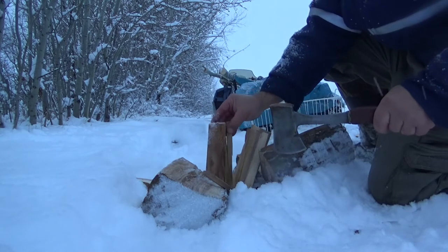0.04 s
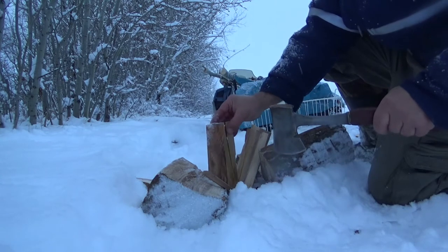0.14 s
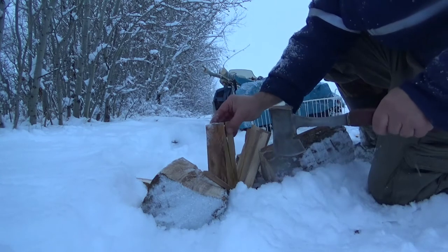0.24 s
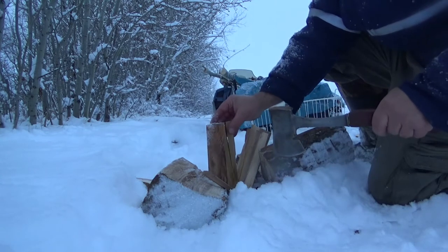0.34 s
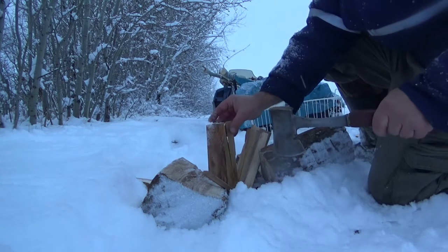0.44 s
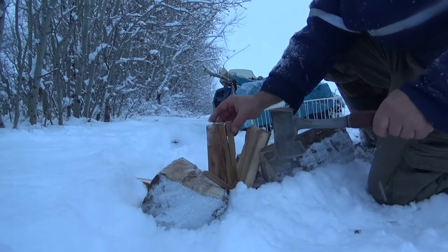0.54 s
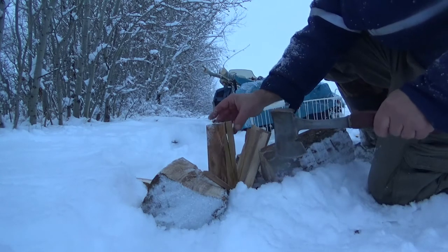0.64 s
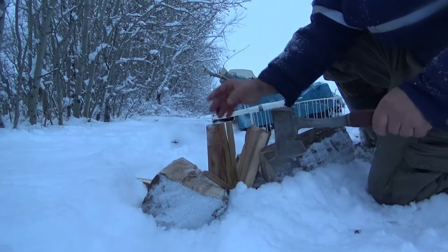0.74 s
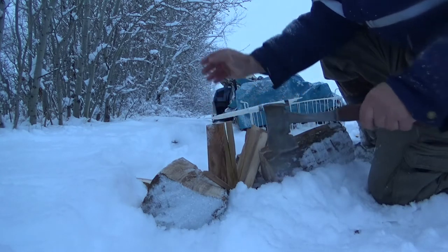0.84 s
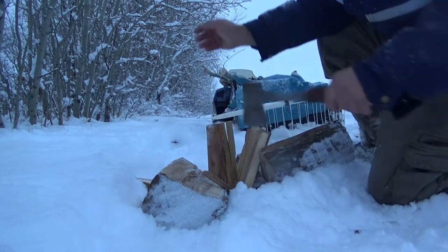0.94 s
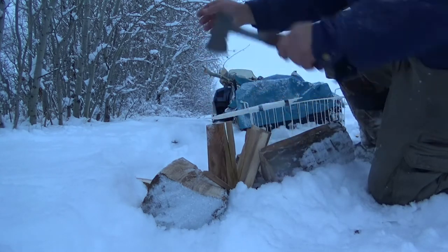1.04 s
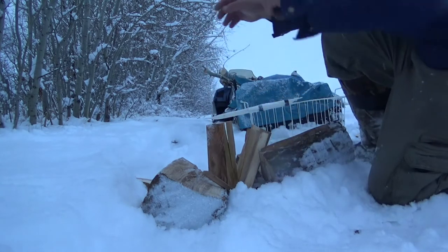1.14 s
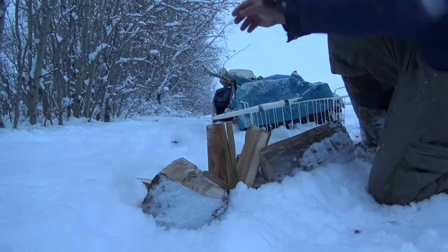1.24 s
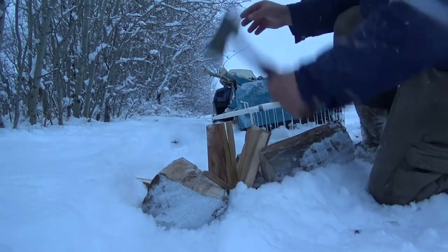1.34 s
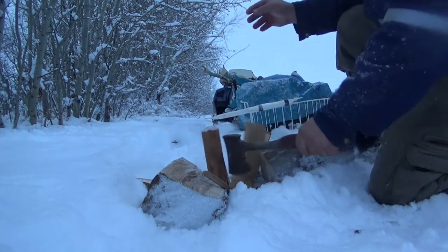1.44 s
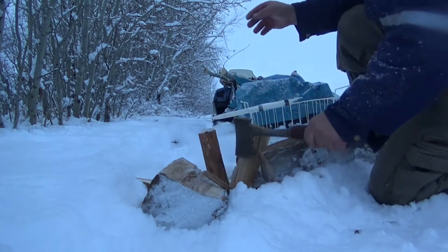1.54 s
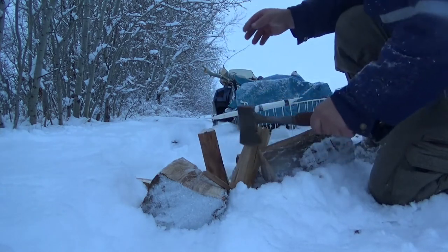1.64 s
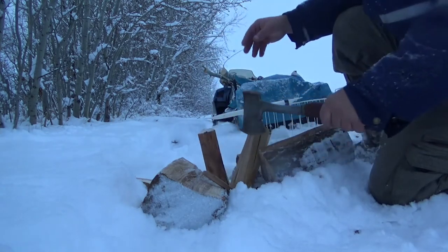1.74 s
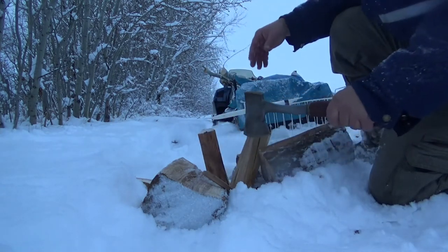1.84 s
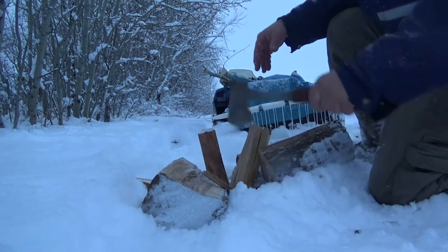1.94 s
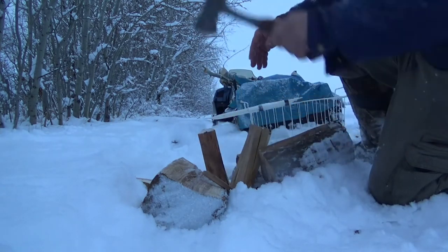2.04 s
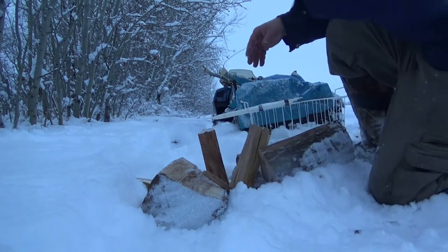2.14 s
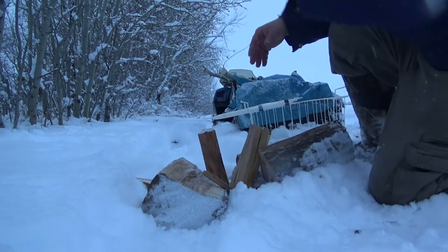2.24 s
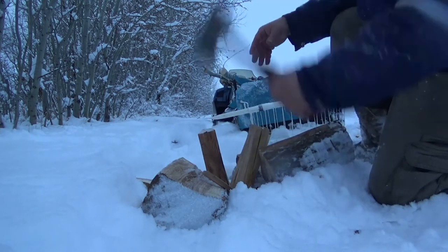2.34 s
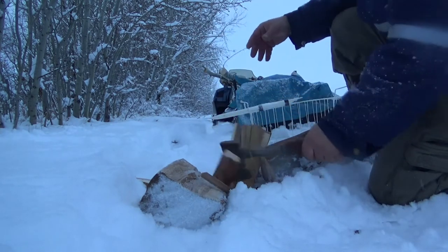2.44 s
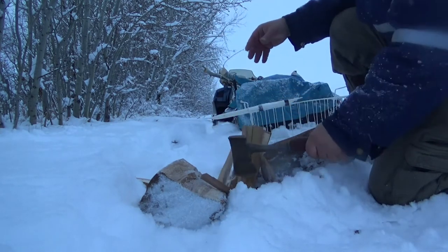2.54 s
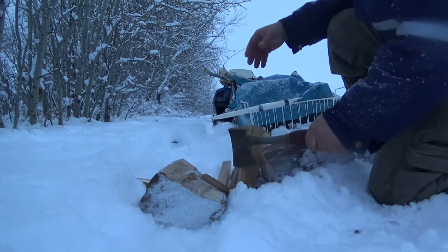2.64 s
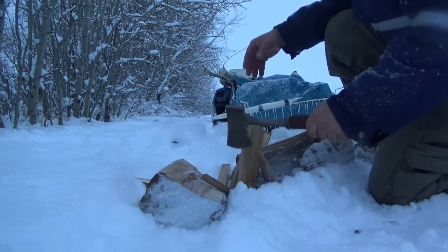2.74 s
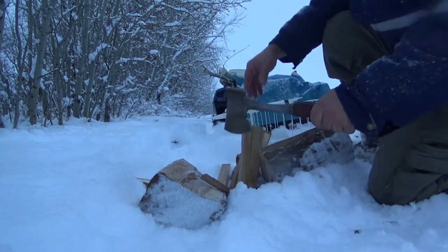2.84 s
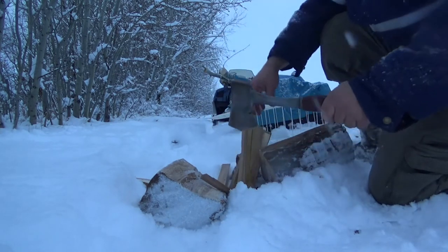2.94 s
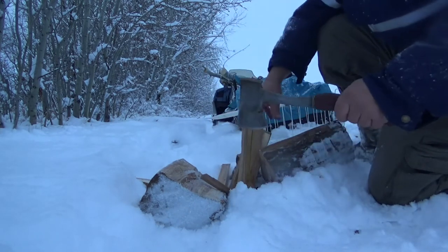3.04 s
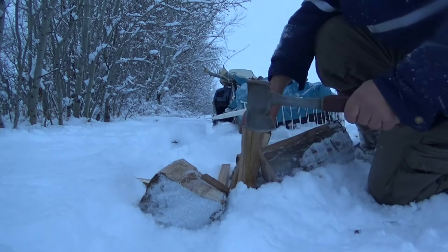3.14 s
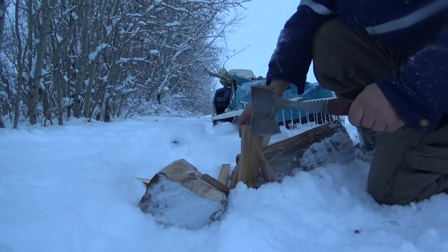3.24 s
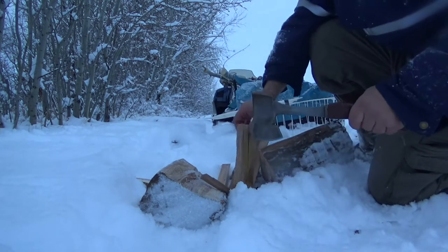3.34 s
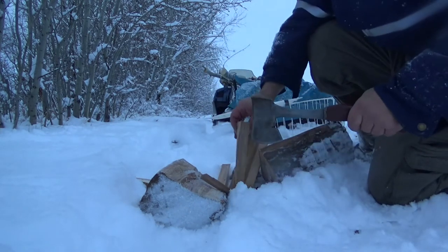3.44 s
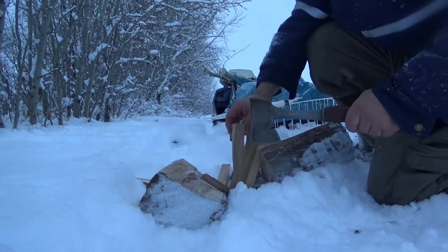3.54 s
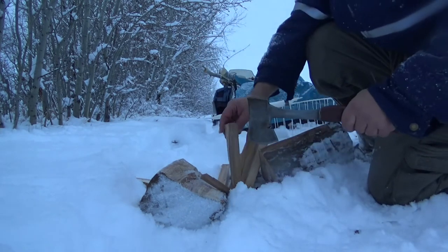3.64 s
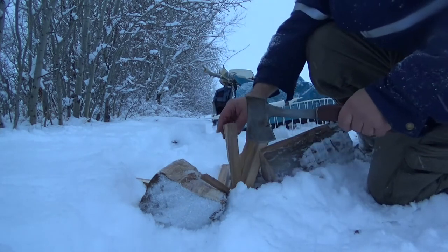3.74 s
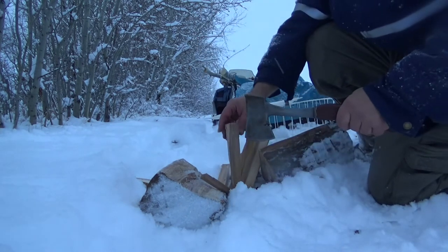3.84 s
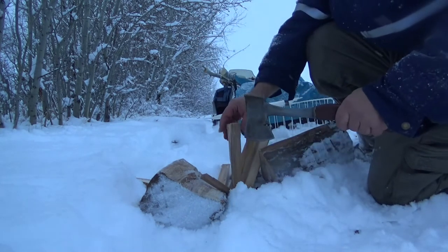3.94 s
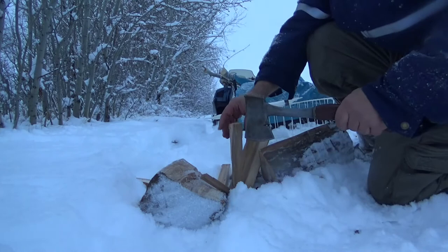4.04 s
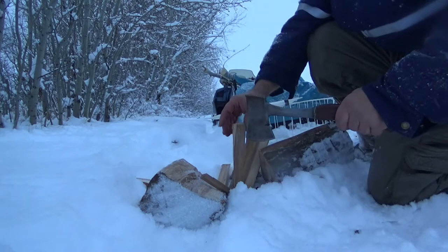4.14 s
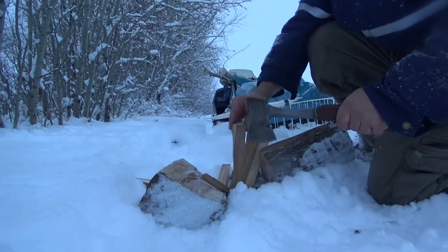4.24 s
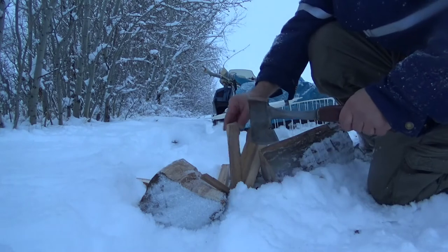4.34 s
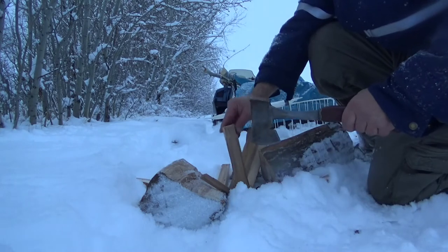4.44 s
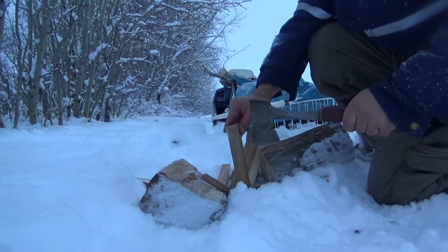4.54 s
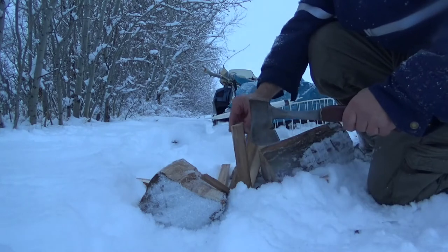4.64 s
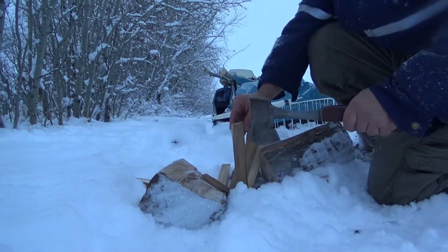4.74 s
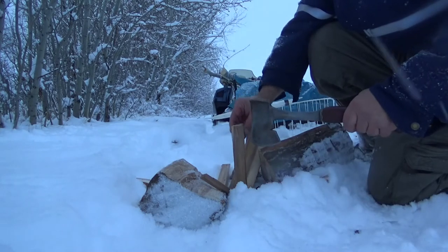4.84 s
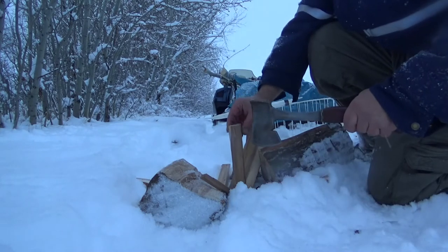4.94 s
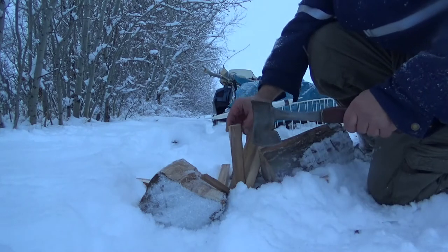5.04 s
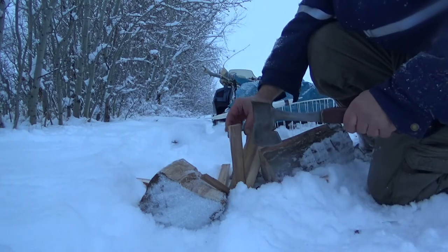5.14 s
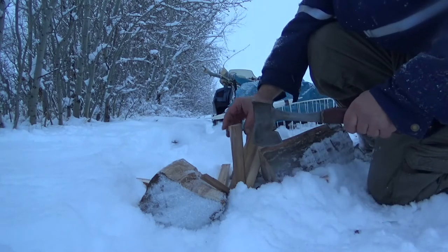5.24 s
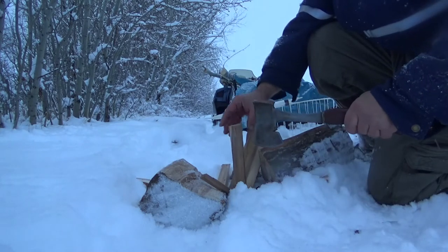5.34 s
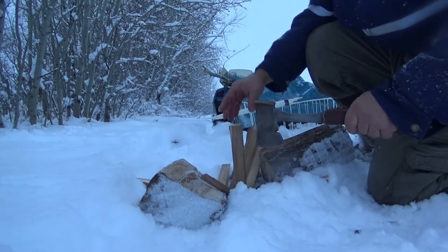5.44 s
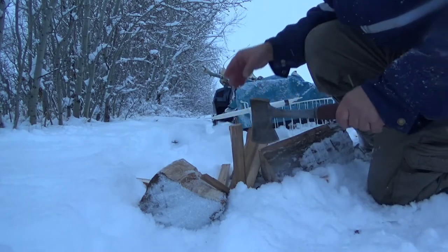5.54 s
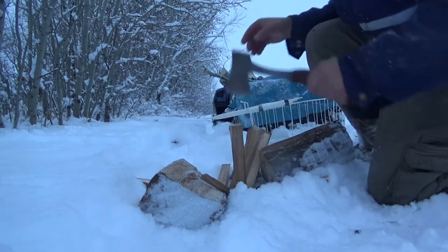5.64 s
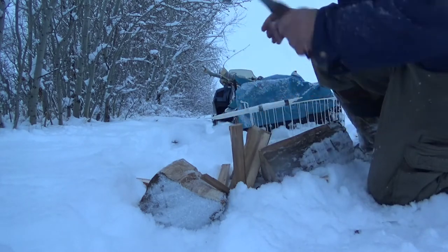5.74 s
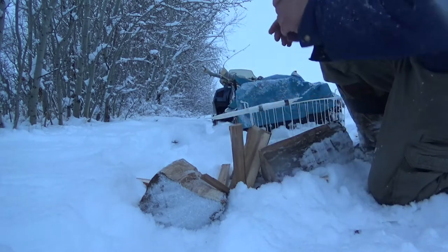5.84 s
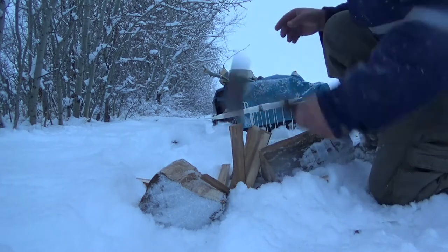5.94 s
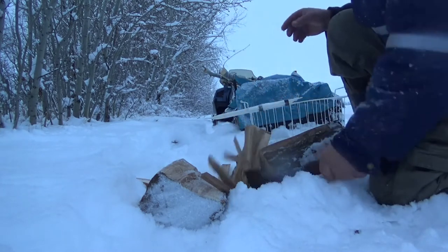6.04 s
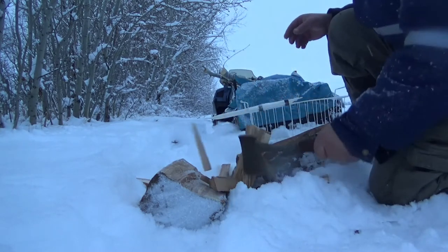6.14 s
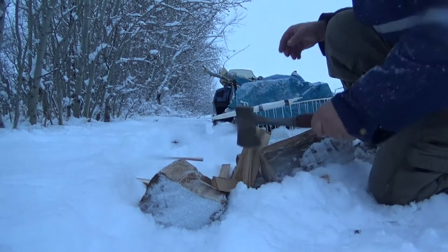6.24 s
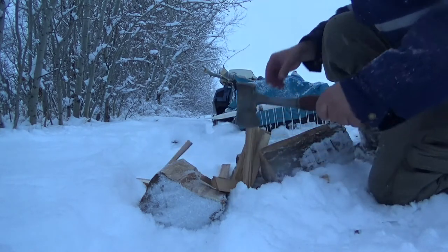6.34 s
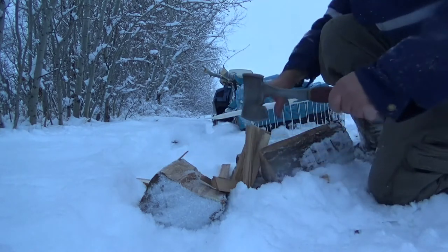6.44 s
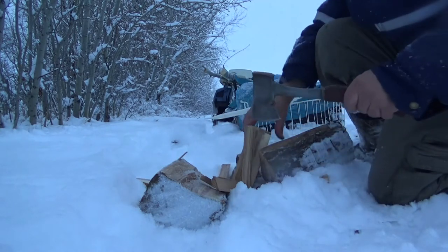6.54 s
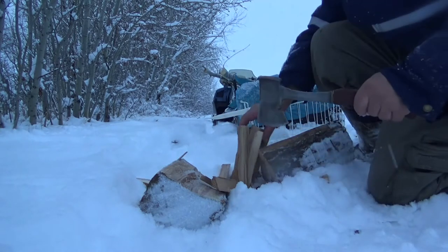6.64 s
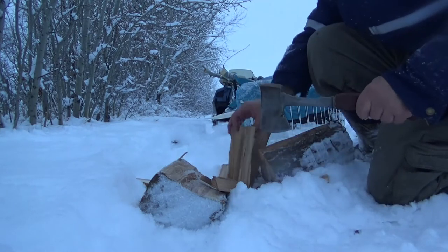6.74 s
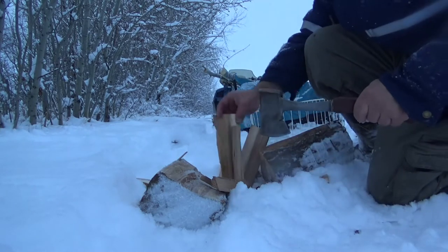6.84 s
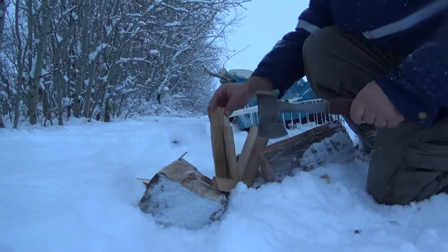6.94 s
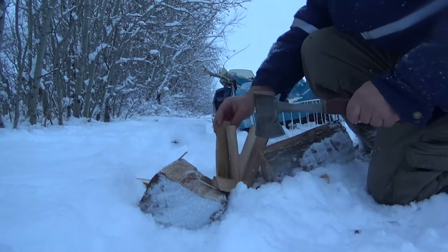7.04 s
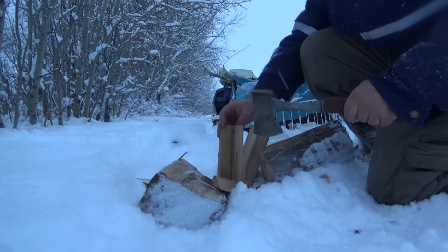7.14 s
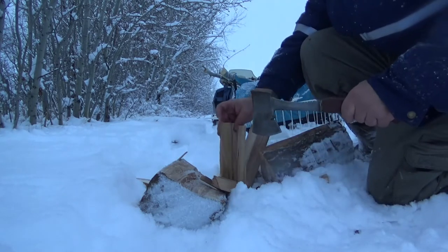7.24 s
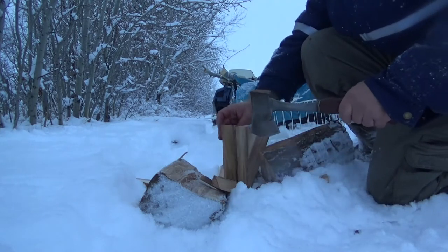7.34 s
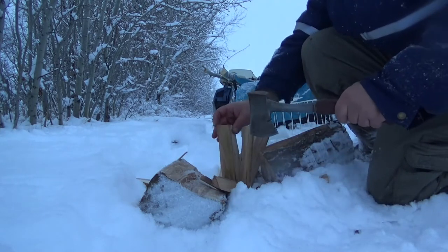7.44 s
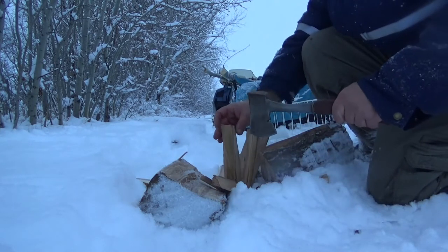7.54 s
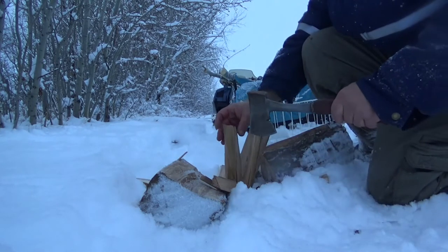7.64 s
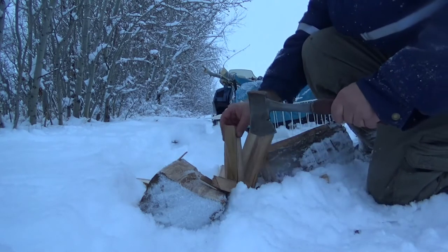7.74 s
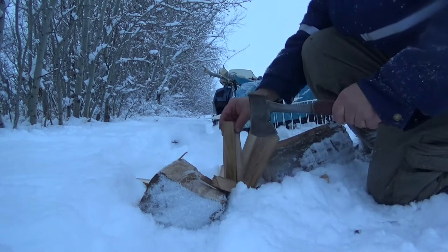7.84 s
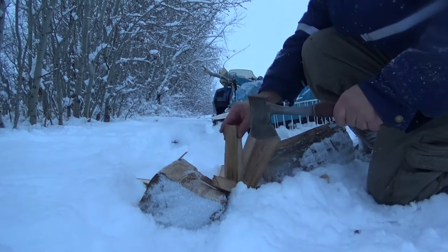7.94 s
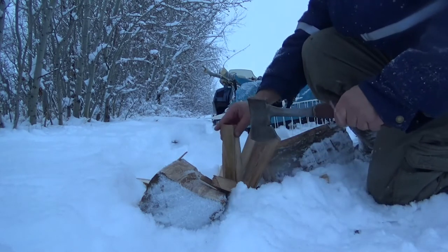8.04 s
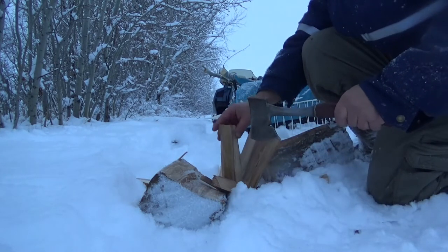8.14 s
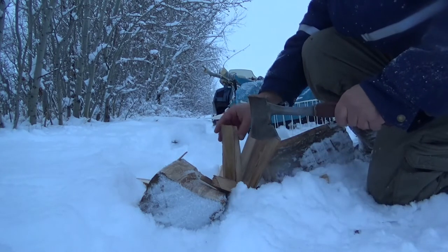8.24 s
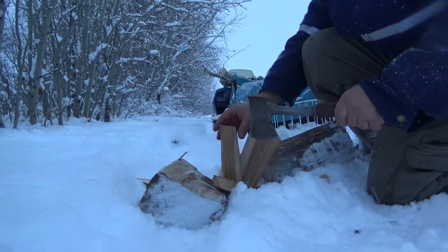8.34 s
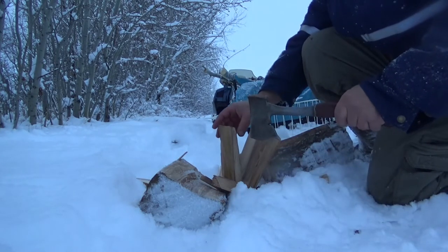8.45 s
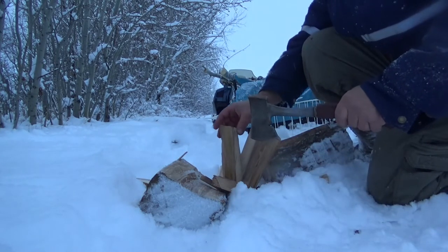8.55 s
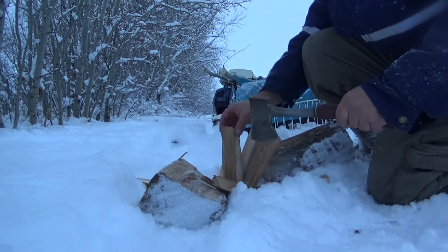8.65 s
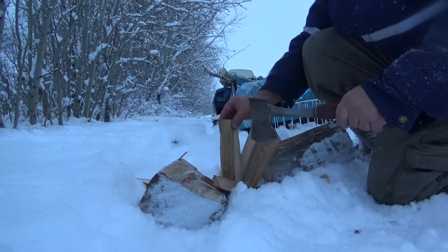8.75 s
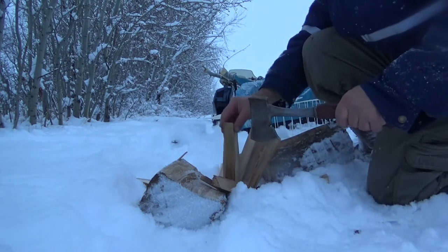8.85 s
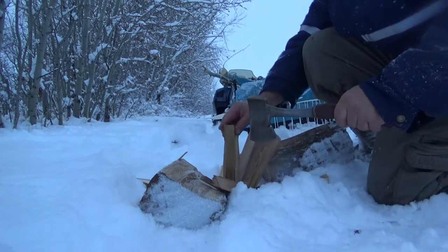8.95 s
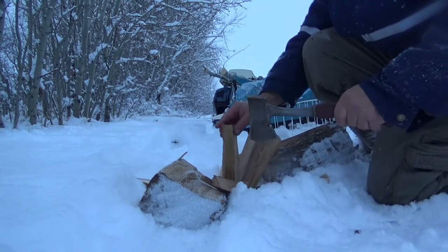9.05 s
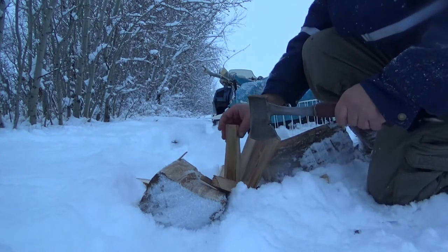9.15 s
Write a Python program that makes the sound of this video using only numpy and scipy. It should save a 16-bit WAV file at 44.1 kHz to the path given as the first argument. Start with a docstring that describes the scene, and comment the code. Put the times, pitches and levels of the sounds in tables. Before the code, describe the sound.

A dry, close outdoor scene: faint hum fading, jacket rustling, then a crisp hatchet blow and a second with longer tearing wood. A quiet pause of handling follows before a loud third crack with snapping, ticking chips. Sticks are then set up with small knocks and scrapes. Snow deadens the space; a hedge gives a barely audible tail, beneath soft air hiss and a tiny regular camera chirp. Everything sits nearly central.

```python
"""A faint hum dies away as someone kneeling in snow gets ready; then a hatchet splits kindling in three chops.
Two chops come close together and a third after a pause: a jacket swish, a bite of the blade, tearing fibres.
Between and after them splinters snap and clink, and pieces scrape and knock, built from shaped noise and modes.
Snow swallows nearly all echo; a hedge returns a faint tail, over still air and the camera's tiny, even chirp."""
import sys
import numpy as np
from scipy import signal
from scipy.fft import rfft, irfft
from scipy.io import wavfile

SR = 44100
rng = np.random.default_rng(int(sys.argv[2]) if len(sys.argv) > 2 else 0)


def inscribe(sig):
    """Save sig as 16-bit PCM at rate SR to the path in sys.argv[1].

    A 1-D sig is mono; a 2-D sig holds one channel per row.
    Samples are clipped to [-1, 1] before scaling.
    """
    pcm = np.round(np.clip(np.atleast_2d(sig).T, -1, 1) * 32767)
    wavfile.write(sys.argv[1], SR, pcm.astype(np.int16))


N = 405279
TIME = np.arange(N) / SR  # s
SHORT = TIME[:SR // 4]  # the time axis of one short event, s
FREQ = np.maximum(np.fft.rfftfreq(2048, 1 / SR), 1)  # axis of all spectra, Hz

# hatchet blows: t/s, bite level/dB, tearing hold/s, tearing t60/s, crackle level/dB, wood body level/dB
BLOWS = [(1.3509, -14.5, 0.01, 0.13, -17, -24), (2.35, -17, 0.027, 0.29, -33.5, -29),
         (5.9409, -12, 0.015, 0.13, -18, -25)]


def undb(db):
    """Decibels to gain."""
    return 10 ** (np.asarray(db) / 20)


def unit(x):
    """Scale to rms 1."""
    return x / np.sqrt(np.mean(x ** 2) + 1e-20)


def add(out, s, x):
    """Mix a sound in at time s."""
    i = max(int(s * SR), 0)
    out[i:i + len(x)] += x[:N - i]


def shape(points):
    """A spectrum in dB, joined on a log-frequency axis."""
    hz, db = np.transpose(points)
    return np.interp(np.log(FREQ), np.log(hz), db)


def hump(hz, octaves):
    """A bell of height 1 around a pitch."""
    return np.exp(-.5 * (np.log2(FREQ / hz) / octaves) ** 2)


def resonance(hz, q):
    """Power gain of one damped resonance."""
    return 1 / (1 + (q * (FREQ / hz - hz / FREQ)) ** 2)


def colour(x, db):
    """Causal minimum-phase filter with the given spectrum and unit power gain."""
    cepstrum = irfft(np.log(undb(db)))
    half = len(cepstrum) // 2
    # folding the cepstrum forward puts the response's energy first
    cepstrum[1:half] *= 2
    cepstrum[half + 1:] = 0
    response = irfft(np.exp(rfft(cepstrum)))[:half]
    return signal.fftconvolve(x, response / np.linalg.norm(response))[:len(x)]


def fade(t, t60):
    """Full level up to t = 0, then falls 60 dB in t60."""
    return undb(-60 * np.maximum(t, 0) / t60)


def opening(x, length, db):
    """Scale a sound so that its first moments have the given rms level."""
    first = x[:max(int(length * SR), 2)]
    return x * undb(db) / np.sqrt(np.mean(first ** 2) + 1e-20)


def walk(rate):
    """Random wander that takes a new normal value, rate times a second, with straight lines between."""
    return np.interp(TIME * rate, np.arange(2000), rng.standard_normal(2000))


def grains(size, rate, spread_db):
    """Tiny fractures at random moments, rate per second, a few much stronger than the rest."""
    chance = rng.random(size)
    strength = np.minimum(rng.exponential(size=size), 4)
    sign = rng.choice([-1, 1], size)
    return unit((chance < rate / SR) * sign * undb(spread_db * strength))


def chops(chips_s=0.21, chips_db=-40):
    """The blade bites, the log thuds, its fibres tear and die away, and chips fall."""
    bite_hz, thud_hz, thud_db = 7250, 945, -35.5
    tear_delay = .0028  # s until the wedge starts to tear the log
    out = np.zeros(N)
    for s, bite_db, hold, t60, high_db, wood_db in BLOWS:
        add(out, s, crack(bite_hz, bite_db))
        add(out, s, knock(thud_hz, thud_db))
        tearing = friction(hold, high_db, wood_db, t60, rate=6000, spread_db=4.0, patchy_db=3,
                           rise=.00027, ring_db=-14.5, ground_db=-43)
        add(out, s + tear_delay, tearing)
        add(out, s, crumbs(chips_s, chips_db, count=9))
    return out


def crack(hz, db, t60=0.0066, tail_db=-20, tail_t60=0.04, q=3.1, broad_db=-13, rise=0.00013):
    """A bundle of fibres lets go at once, in the splinter's own band; thicker splinters ring lower and longer."""
    # broad colour of snapping wood: f/Hz, level/dB
    snap_colour = [(40, -45.5), (200, -21), (700, -18), (1400, -3), (3000, -3), (6000, -4.5), (9500, 2.5),
                   (12500, -12.5), (16000, -14.5)]
    attack = .003  # s over which the level holds
    thickness = (5000 / hz) ** 0.31  # 1 for a 5 kHz splinter
    t = SHORT[:SR // 16]
    envelope = fade(t, t60 * thickness) + undb(tail_db) * fade(t, tail_t60 * thickness)
    onset = rise * undb(-db / 2)  # s; the quieter the burst, the softer its onset
    burst = rng.choice([-1., 1.], len(t)) * envelope * (1 - np.exp(-t / onset))
    band = 10 * np.log10(resonance(hz, q) + undb(broad_db) ** 2)
    return opening(colour(burst, shape(snap_colour) + band), attack, db)


def friction(length, high_db, wood_db, t60, rate, spread_db, patchy_db, rise, ring_db, ground_db, ground_hz=180):
    """Bunched small fractures or slips sound as bright crackle, through the wood's body and in packed snow."""
    # bright crackle of fibres and crust: f/Hz, level/dB
    crackle_colour = [(1000, -43.5), (3000, -5.5), (4500, 3), (6000, -3), (8000, 4), (10000, -2.5),
                      (12000, -6), (16000, -28.5)]
    # the wood's duller body: f/Hz, level/dB
    body_colour = [(40, -38.5), (180, -16.5), (450, -13.5), (800, -15), (1400, -2), (2200, 1.5), (4000, 4),
                   (8000, -17.5)]
    bunches = undb(patchy_db * np.tanh(walk(190)[:len(SHORT)]))
    envelope = (1 - np.exp(-SHORT / rise)) * fade(SHORT - length, t60)
    slips = grains(len(SHORT), rate, spread_db) * bunches * envelope
    crackle = opening(colour(slips, shape(crackle_colour)), length, high_db)
    body = unit(colour(slips, shape(body_colour))) + undb(ring_db) * unit(billet(slips))
    # 20 log of a power gain: the snow's resonance counts twice
    ground_spectrum = 20 * np.log10(resonance(ground_hz, q=0.67))
    ground = undb(ground_db) * unit(colour(slips, ground_spectrum))
    return crackle + opening(body + ground, length, wood_db)


def billet(x, low_hz=1300, octaves=1.8, t60=0.046, count=4):
    """Each split piece has its own few modes, spread over the woody middle range."""
    pitches = low_hz * 2 ** (octaves * (np.arange(count) + rng.random(count)) / count)
    ring = sum(np.sin(2 * np.pi * hz * SHORT) for hz in pitches) * fade(SHORT, t60)
    return signal.fftconvolve(x, ring)[:len(x)]


def crumbs(within, db, count):
    """Chips and snow crumbs tick down after a disturbance; later ones are fainter, most are tiny and bright."""
    out = np.zeros(N)
    for late, size in rng.random((count, 2)):
        hz = 9000 / 2 ** (2.0 * size ** 2)
        add(out, late * within, crack(hz, db - 10 * late))
    return out


def snaps():
    """Fibre bundles break and splinters land, each a short burst in its own band."""
    # snaps of wood and ticks of splinters: t/s, level/dB, band centre f/Hz
    breaks = [(1.3676, -18, 2570), (1.3728, -19, 2620), (1.381, -18, 9110), (1.4, -26, 2640),
              (1.4721, -27, 7100), (2.3532, -18.5, 3450), (2.3857, -16, 4130), (2.4237, -24, 1930),
              (2.4306, -27, 4270), (2.584, -39.5, 7190), (5.965, -13.5, 3100), (5.9786, -15, 2270),
              (6.03, -15, 9800), (6.0512, -18.5, 8400), (6.1304, -23.5, 9500), (6.1723, -34.5, 7260),
              (6.206, -33, 2420), (6.2458, -44, 8000), (6.304, -33.5, 5500), (6.7768, -30, 6030),
              (7.0638, -28, 8260), (7.211, -46, 2370), (7.2993, -34.5, 1330), (7.765, -39.5, 7000),
              (8.3979, -46.5, 7800), (8.491, -45, 6200), (8.677, -40, 8600), (8.853, -40.5, 7850)]
    out = np.zeros(N)
    for s, db, hz in breaks:
        add(out, s, crack(hz, db))
    return out


def clinks():
    """One sharp contact sets a loose stick ringing."""
    # loose sticks struck: t/s, level/dB, pitch relative to the thin stick (ratio)
    strikes = [(1.3736, -22, 1.03), (2.352, -37.5, 0.49), (2.386, -33, 0.76), (2.4667, -39.5, 0.65),
               (2.705, -52, .69), (6.206, -41.5, .95), (6.305, -42, 1.02)]
    attack = .003  # s over which the level holds
    out = np.zeros(N)
    for s, db, pitch in strikes:
        contact = signal.unit_impulse(len(SHORT))
        add(out, s, opening(stick(contact, pitch), attack, db))
    return out


def stick(x, pitch):
    """Ring the modes of a dry stick; a bigger one rings lower and longer than the thin one."""
    # modes of the thin dry stick, at pitch ratio 1: f/Hz, level/dB, t60/s
    modes = [(1235, -20, 0.1), (2276, -2, 0.038), (2614, 0.5, 0.066), (3860, -9, .05), (5100, 0, 0.036),
             (7540, -8, 0.045), (8100, -5, .025)]
    t = SHORT * pitch  # stretching time lowers the modes and lengthens their decay
    ring = sum(undb(db) * np.sin(2 * np.pi * hz * t) * fade(t, t60) for hz, db, t60 in modes)
    return signal.fftconvolve(x, ring)[:len(x)]


def scrapes(crumbs_s=.1, crumbs_db=-53):
    """A piece slides, presses into the snow and knocks a few crumbs loose."""
    # pieces scraping over each other and over crusted snow: t/s, length/s, crackle level/dB, wood body level/dB
    slides = [(0.09, 0.0079, -48.5, -52), (1.4345, 0.014, -26.5, -28), (2.52, 0.0071, -35, -36.5),
              (3.32, 0.095, -53.5, -56), (3.385, 0.0086, -39, -42.5), (4.336, 0.039, -47, -52.5),
              (4.749, 0.016, -53.5, -64), (6.052, 0.089, -48, -49), (6.581, 0.011, -41, -47),
              (6.604, .13, -47.5, -53.5), (6.809, .019, -46.5, -45), (6.862, 0.011, -44, -50.5),
              (6.978, 0.1, -43.5, -45), (7.242, 0.011, -47.5, -51), (7.734, 0.021, -45, -50),
              (7.765, 0.055, -54, -61), (7.885, 0.0053, -44.5, -51), (8.669, 0.068, -52, -55),
              (8.809, .046, -48, -52.5)]
    out = np.zeros(N)
    for s, length, high_db, wood_db in slides:
        sliding = friction(length, high_db, wood_db, t60=0.015, rate=3500, spread_db=1.5, patchy_db=8.5,
                           rise=0.00049, ring_db=-9.0, ground_db=-23)
        add(out, s, sliding)
        add(out, s, crumbs(length + crumbs_s, crumbs_db, count=3))
    return out


def knocks():
    """A piece bumps its neighbour or the ground and gives one damped resonance."""
    # knocks of wood on wood and into the snow: t/s, level/dB, resonance f/Hz
    bumps = [(1.382, -42, 470), (1.444, -24, 1960), (2.5192, -36.5, 620), (2.585, -48.5, 470),
             (3.086, -51, 288), (4.65, -58.5, 230), (6.052, -46, 520), (6.1023, -45, 1290),
             (6.135, -49.5, 428), (6.561, -54.5, 262), (6.658, -34, 1620), (6.999, -38, 1090),
             (7.066, -55.5, 198), (7.243, -50, 470), (7.3, -54, 240), (8.857, -54, 343)]
    out = np.zeros(N)
    for s, db, hz in bumps:
        add(out, s, knock(hz, db))
    return out


def knock(hz, db, t60=0.015, q=2.5, dull_hz=2400):
    """Wood is bumped; the snow damps its one broad resonance at once."""
    attack = .008  # s over which the level holds
    push = rng.choice([-1., 1.], len(SHORT)) * fade(SHORT, t60)
    softness = 1 / (1 + (FREQ / dull_hz) ** 2)
    return opening(colour(push, 10 * np.log10(resonance(hz, q) * softness)), attack, db)


def jacket(flutter_db=2.6):
    """Weave threads catch as each move speeds up and slows down; folds add a lower rustle, and all of it flutters."""
    # arm moves (lifting, reaching, setting upright, gathering, shifting grip), levels ahead of the flutter:
    # fastest at t/s, swell time/s, sleeve hiss level/dB, fold rustle level/dB
    moves = [(0.7, 0.044, -67, -62), (0.94, .055, -48, -55), (1.08, 0.14, -60.5, -57),
             (2.13, 0.033, -60.5, -64), (2.95, 0.27, -62.5, -61.5), (3.5, 0.14, -63, -66.5),
             (4.38, .05, -56, -68), (4.72, 0.049, -62.5, -66), (5.55, 0.069, -53.5, -54),
             (6.37, 0.092, -57, -57), (6.9, 0.32, -58.5, -62), (7.5, 0.039, -63.5, -75),
             (7.82, .06, -59, -66.5), (8.75, .06, -65, -71), (9.17, .05, -67.5, -74)]
    # sleeve hiss: f/Hz, level/dB
    hiss_colour = [(800, -22), (2500, -6.5), (4500, 1), (7500, 4), (9500, 0.5), (11500, -9.5),
                   (16000, -14.5)]
    # rustle of folds: f/Hz, level/dB
    folds_colour = [(50, -21.5), (200, -12), (600, -3.5), (1300, 0.5), (2500, -2), (5000, -5),
                    (10000, -33.5)]
    # every downswing swells towards its blow and settles after it
    swing_s, swing_hiss_db, swing_folds_db = 0.24, -60.5, -59
    swings = [(s, swing_s, swing_hiss_db, swing_folds_db) for s, *_ in BLOWS]
    rubbing, folding = np.zeros(N), np.zeros(N)  # summed power of all moves
    for s, swell, high_db, low_db in list(moves) + swings:
        speed = 1 / np.cosh(np.clip((TIME - s) / swell, -20, 20))
        rubbing += (undb(high_db) * speed) ** 2
        folding += (undb(low_db) * speed) ** 2
    hiss = colour(grains(N, rate=4400, spread_db=2.0), shape(hiss_colour)) * np.sqrt(rubbing)
    folds = colour(grains(N, rate=4800, spread_db=3.5), shape(folds_colour)) * np.sqrt(folding)
    return (hiss + folds) * undb(flutter_db * walk(35))


def hedge(x, t60=0.27, echo_db=-27, rise=0.0083, dull_hz=7000):
    """Bare twigs scatter a faint, smooth, dulled tail; each call draws new twigs."""
    t = TIME[:SR]
    twigs = rng.standard_normal(SR) * fade(t, t60) * (1 - np.exp(-t / rise))
    response = colour(twigs, -10 * np.log10(1 + (FREQ / dull_hz) ** 2))
    return undb(echo_db) * signal.fftconvolve(x, response / np.linalg.norm(response))[:N]


def air(level_db=-65, side_db=-11, far_hz=650):
    """Still winter air as coloured noise, with a far murmur that is wider than the hiss."""
    # colour of the still air: f/Hz, level/dB
    air_colour = [(24, -54.5), (40, -21), (291, -7), (638, -4.5), (899, -1.5), (1180, -4.5), (2710, -7),
                  (2990, -7), (12000, -12), (16000, -17.5)]
    mid = colour(rng.standard_normal(N), shape(air_colour))
    murmur = shape(air_colour) + 12 * hump(far_hz, 1.2)
    side = colour(rng.standard_normal(N), murmur) * undb(side_db)
    return undb(level_db) * (mid + side * np.array([[1], [-1]]))


def hum(hz=93.6, db=-67, t60=1.3, step_db=-8):
    """A faint low hum of three harmonics, each weaker than the last, dies away at the start."""
    tone = sum(undb(step_db * k) * np.sin(2 * np.pi * (k + 1) * hz * TIME) for k in range(3))
    return undb(db) * tone * fade(TIME, t60)


def camera_tick(rate, hz, db):
    """A tiny mechanism in the camera chirps at an even pace: gated noise through a narrow resonance."""
    gate = np.sin(np.pi * rate * TIME) ** 8  # one pulse per 1/rate s
    # 20 log of a power gain: the resonance counts twice
    chirps = colour(rng.standard_normal(N) * gate, 20 * np.log10(resonance(hz, q=23)))
    return undb(db) * unit(chirps)


def scene(side_db=-22, pan_db=-0.5):
    """All the work happens just ahead of the microphone, almost in the centre."""
    near = chops() + snaps() + clinks() + scrapes() + knocks() + jacket()
    # nearby logs and the kneeling body reflect a little differently to each side
    scatter = rng.standard_normal(len(SHORT)) * fade(SHORT, .015)
    side = undb(side_db) * signal.fftconvolve(near, scatter / np.linalg.norm(scatter))[:N]
    direct = np.array([(near + side) * undb(pan_db / 2), (near - side) * undb(-pan_db / 2)])
    # one tail shared by both sides, plus one of its own for each
    echo = hedge(near) + np.array([hedge(near, echo_db=-24.5) for _ in range(2)])
    frame_hz = 29.97
    camera = camera_tick(frame_hz, 2710, -77.5) + camera_tick(frame_hz / 2, 3350, -85.5)
    return direct + echo + air() + hum() + camera


def record(dry, low_hz=95, top_hz=15800):
    """The camera thins the deep bass, rounds the loudest peaks and cuts the top of the treble."""
    thin = signal.sosfilt(signal.butter(1, low_hz, "high", fs=SR, output="sos"), dry)
    rounded = np.tanh(thin)
    return signal.sosfilt(signal.ellip(8, .2, 70, top_hz, fs=SR, output="sos"), rounded)


dry = scene()
out = record(dry)
inscribe(out)
```